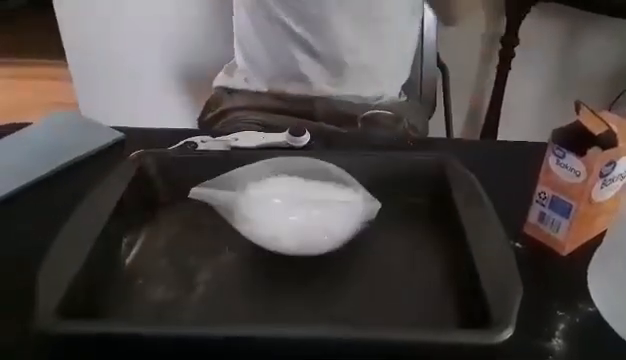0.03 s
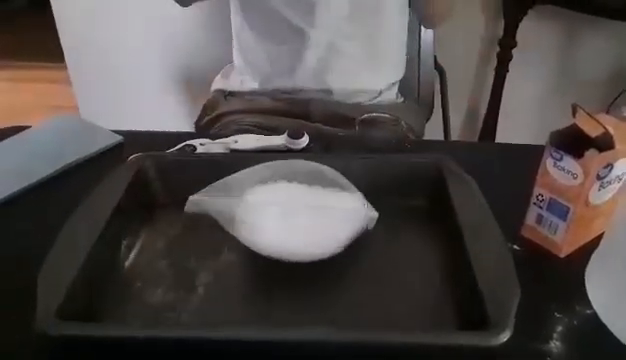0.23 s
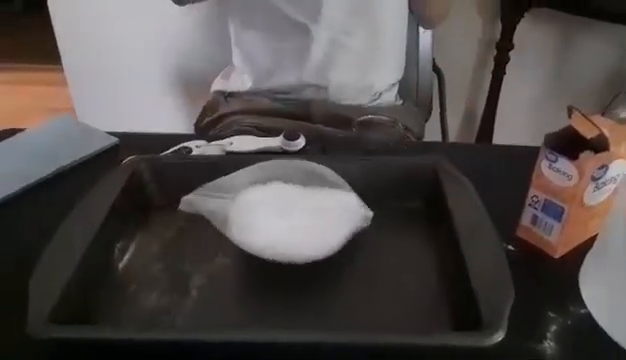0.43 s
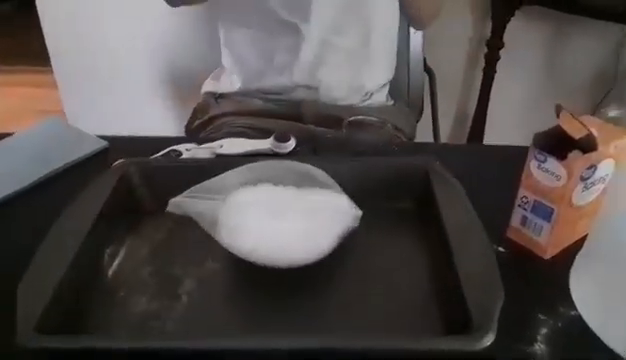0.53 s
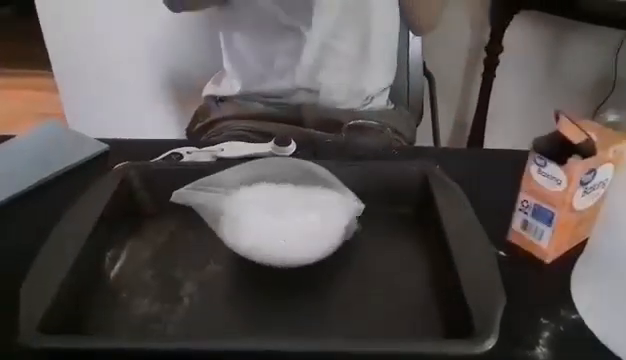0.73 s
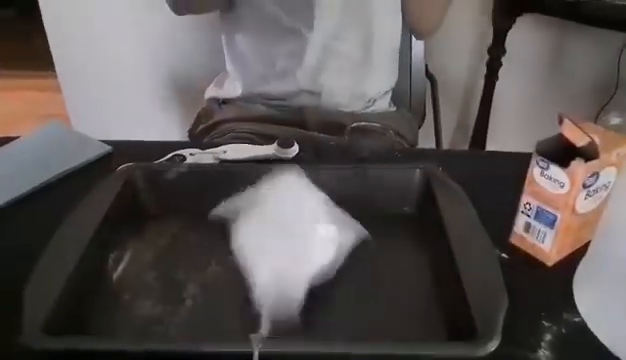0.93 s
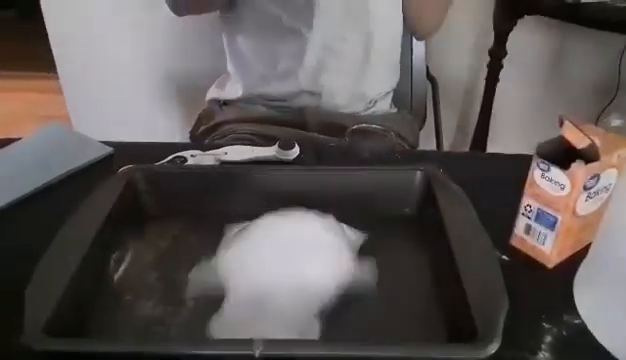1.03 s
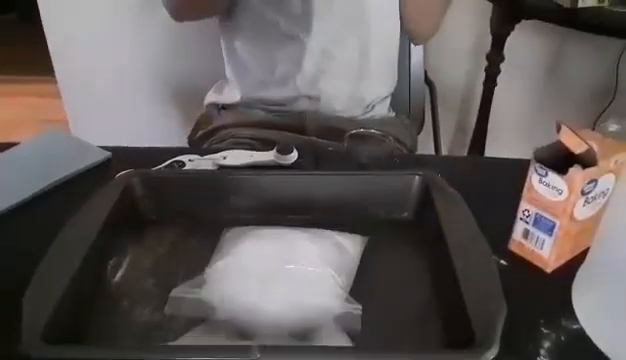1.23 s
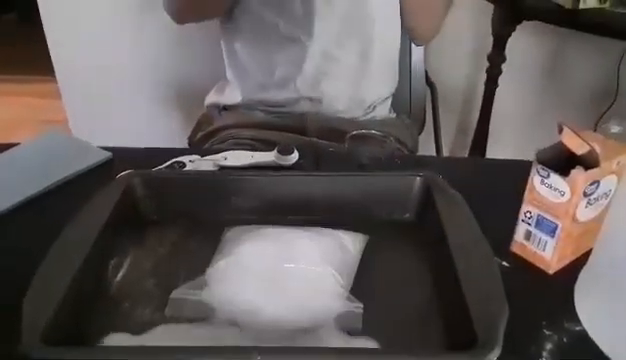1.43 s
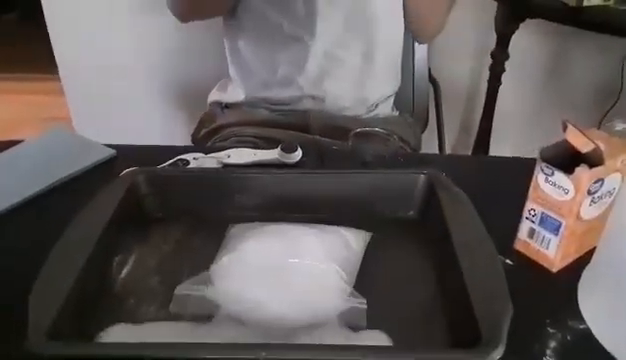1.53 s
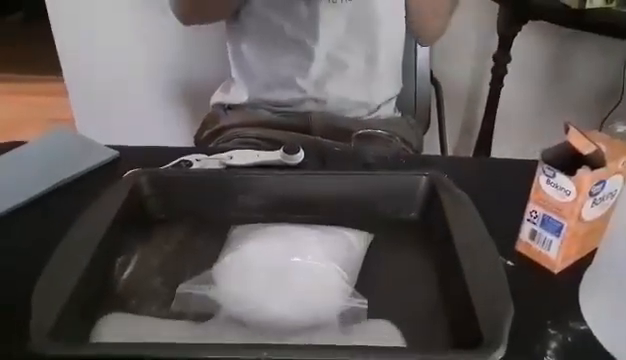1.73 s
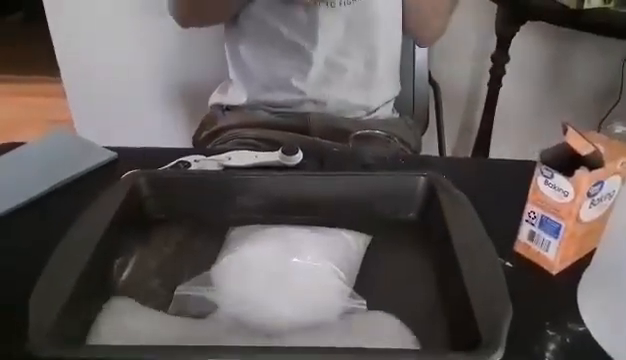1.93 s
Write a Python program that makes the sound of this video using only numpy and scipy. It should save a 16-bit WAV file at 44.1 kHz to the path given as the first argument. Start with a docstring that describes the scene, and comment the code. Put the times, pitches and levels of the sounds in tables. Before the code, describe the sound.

A plastic bag bursts with two loud bangs in a small room. Faint fizzing and a dull, fading rustle come first. At about 0.2 seconds a sharp, bright crack briefly rings a metal tray. At 0.8 seconds the bag gives way with a darker bang and a deep thump, dying quickly. Foam keeps hissing faintly, with a few tiny plastic ticks, until about 2 seconds.

```python
"""Soda and vinegar bag bursting

A sealed plastic bag of fizzing soda and vinegar swells in a metal baking tray, in a small room.
A sharp, bright crack rings tray and room; half a second later the bag bursts and the freed gas
thumps. Bubbles hiss throughout over a dull, fading rustle, and plastic and foam tick now and then."""
import sys
import numpy as np
from scipy import signal
from scipy.fft import rfft, irfft
from scipy.io import wavfile

SR = 44100
rng = np.random.default_rng(int(sys.argv[2]) if len(sys.argv) > 2 else 0)


def master(y):
    """Save y as 16-bit WAV."""
    cut = np.clip(np.atleast_2d(y).T, -1, 1)
    pcm = np.round(cut * 32767)  # scale
    wavfile.write(sys.argv[1], SR, pcm.astype(np.int16))


N = 88200
T = np.arange(N) / SR
HZ = np.maximum(np.fft.rfftfreq(N, 1 / SR), 1)

# the two bangs: start_s, shock_db, shock_length_s, room_db, room_swell_s
CRACK = (0.2306, -2, 0.0007, -10.9, 0.031)
BURST = (0.7969, -6, 0.0003, -20, 0.011)
# the steel tray's bright modes: pitch_hz, relative_db, t60_s
TRAY_MODES = [(850, -2, 0.26), (1121, -4, 0.22), (1873, 2, 0.17), (1927, 0, 0.18), (2027, -1.5, 0.18),
              (4668, -10, 0.22), (6102, -5.5, 0.22), (6690, -10, 0.22)]


def from_db(db):
    """Decibels to gain."""
    return 10 ** (np.asarray(db) / 20)


def rms_one(x):
    """Scale to unit level."""
    return x / np.sqrt(np.mean(x ** 2) + 1e-20)


def at_hz(points, hz):
    """Read a curve on a log-frequency axis."""
    freqs, values = np.transpose(points)
    return np.interp(np.log(hz), np.log(freqs), values)


def fader(points):
    """A dB curve as gain over time."""
    return from_db(np.interp(T, *np.transpose(points)))


def decay(age, t60):
    """One until age zero, then an exponential decay."""
    return from_db(-60 * np.maximum(age, 0) / t60)


def wander(rate_hz):
    """A random curve that glides to a new value rate_hz times a second."""
    return np.interp(T * rate_hz, np.arange(N), np.clip(rng.standard_normal(N), -2, 2))


def filtered(x, order, hz, kind):
    """A Butterworth filter."""
    return signal.sosfilt(signal.butter(order, hz, kind, fs=SR, output="sos"), x)


def band_of(x, low_hz, high_hz):
    """Keep one band of a signal, at unit level."""
    return rms_one(filtered(x, 2, [low_hz, high_hz], "band"))


def coloured(x, colour):
    """Shape a signal with an EQ curve, at unit level."""
    return rms_one(irfft(rfft(x) * from_db(at_hz(colour, HZ)), N))


def diffuse():
    """White stereo noise, centred in the bass and wide in the treble."""
    # likeness of left and right: freq_hz, correlation
    likeness = [(100, 0.97), (350, 0.93), (550, 0.82), (850, 0.5), (2000, 0.35), (3300, 0.05)]
    mid, side = rfft(rng.standard_normal((2, N)))
    alike = at_hz(likeness, HZ)
    return irfft(np.sqrt(1 + alike) * mid + np.sqrt(1 - alike) * side * [[1], [-1]], N)


def fizz():
    """Tiny bubbles merge into a hiss and larger ones pop singly; once spilled, the foam rings the tray."""
    # the foam's hiss: time_s, level_db
    hiss_level = [(0, -47.6), (0.2, -46.3), (0.3, -53), (0.55, -59.5), (0.75, -63.6), (1.1, -62.8),
                  (1.35, -65.6), (1.58, -65.2), (1.65, -62.8), (1.72, -64.2), (1.89, -64.2), (1.96, -60.2)]
    # the bubbles' tone: freq_hz, relative_db
    colour = [(60, -36), (200, -19), (420, -4), (700, -9.5), (1100, -4.5), (1400, -6), (1800, -1.5),
              (2500, -6.5), (4000, -5.5), (6600, -6.3), (7700, -20), (12000, -19)]
    pops_per_s, spread_db = 900, 3.5
    sizes = from_db(spread_db * np.minimum(rng.exponential(1, (2, N)), 5))
    signs = rng.choice([-1, 1], (2, N))
    clicks = sizes * signs * (rng.random((2, N)) < pops_per_s / SR)
    pops = from_db(-9) * coloured(clicks, colour)
    spill = from_db(-6) * (T > BURST[0]) * band_of(diffuse(), 1730, 2060)
    hiss = coloured(diffuse(), colour)
    return fader(hiss_level) * (hiss + pops + spill)


def rustle():
    """A dull rustle of movement near the table."""
    # the rustle's uneven fade: time_s, level_db
    rustle_level = [(0, -52), (0.22, -53), (0.42, -60), (0.49, -55), (0.58, -72), (0.62, -72), (0.65, -65),
                    (0.69, -73), (1.15, -77), (1.25, -85), (1.65, -84), (1.8, -100)]
    # its bass-heavy tone: freq_hz, relative_db
    colour = [(30, -19), (90, -8), (160, 2), (300, -5), (450, -4), (900, -10), (2500, -35)]
    return fader(rustle_level) * coloured(diffuse(), colour)


def shock(start, db, length):
    """An N-shaped pressure pulse and its first bounces, a touch later on the right."""
    # reflections off tray and table: delay_s, relative_db
    bounces = [(0.0027, -7), (0.005, -9)]
    lag_s = np.array([[0], [0.0001]])
    out = np.zeros((2, N))
    for delay, bounce_db in [(0, 0)] + bounces:
        progress = (T - start - delay - lag_s) / length
        out += from_db(db + bounce_db) * (1 - 2 * progress) * ((progress >= 0) & (progress < 1))
    return filtered(out, 2, 6000, "low")


def rippled(x):
    """Crowded resonances of tray and table leave narrow peaks and dips above the lowest bright mode."""
    depth_db, spacing_hz = 3.2, 55
    knots = np.arange(2000) * spacing_hz
    ripple = np.interp(HZ, knots, np.clip(rng.standard_normal(len(knots)), -2, 2))
    return irfft(rfft(x) * from_db(depth_db * ripple * (HZ > TRAY_MODES[0][0])), N)


def room(start, db, swell_s, colour):
    """Reflections swell in ragged clumps, then die band by band, leaving a faint late tail."""
    # the room's decay: freq_hz, t60_s
    decay_times = [(50, 0.25), (170, 0.29), (400, 0.27), (1000, 0.26), (2200, 0.24), (6000, 0.245)]
    ragged_db, swell_db_per_s, attack_s = 1.8, 90, 0.002
    spectrum = rfft(coloured(rippled(diffuse()), colour))
    age, out = T - start, 0
    late = from_db(-35) * decay(age, t60=0.9)
    for k, (_, t60) in enumerate(decay_times):
        band = at_hz([(hz, j == k) for j, (hz, _) in enumerate(decay_times)], HZ)
        early = decay(age - swell_s, t60) * from_db(ragged_db * wander(rate_hz=250))
        out += irfft(spectrum * band, N) * (early + late)
    swell_db = swell_db_per_s * np.minimum(age - swell_s, 0)
    return from_db(db + swell_db) * np.clip(age / attack_s, 0, 1) * out


def bang(event, colour):
    """A shock and the room's answer, leaning to one side band by band."""
    # stereo lean: freq_hz, left_minus_right_db
    balance = [(550, -0.5), (850, 1.5), (1900, 2), (2800, -1), (6000, -4), (8500, -1)]
    start, shock_db, length, room_db, swell_s = event
    sound = shock(start, shock_db, length) + room(start, room_db, swell_s, colour)
    pan = from_db(at_hz(balance, HZ) * np.array([[.5], [-.5]]))
    return irfft(rfft(sound) * pan, N)


def crack():
    """A sharp crack, and the room answers brightly."""
    # the crack's reverb tone: freq_hz, relative_db
    colour = [(35, -38), (90, -25), (140, -14), (290, -14), (335, 2), (480, 0.5), (610, -7), (800, -1),
              (1350, -10), (1900, 1), (2350, -9.5), (4500, -14.3), (6600, -10.5), (7700, -30),
              (11000, -30.5)]
    return bang(CRACK, colour)


def tray_ring():
    """The tray's ring builds up during the crack, then dies; each ear hears it in another phase."""
    ring_db, build_s = -24, 0.03
    age, out = T - CRACK[0], 0
    for hz, db, t60 in TRAY_MODES:
        phase = rng.uniform(0, 2 * np.pi) + rng.standard_normal((2, 1))
        out += from_db(ring_db + db) * np.sin(2 * np.pi * hz * age + phase) * decay(age - build_s, t60)
    return out * np.clip(age / build_s, 0, 1)


def bright_snaps():
    """Bright snaps of a few milliseconds sharpen the bangs."""
    # bright snaps: start_s, level_db
    snaps = [(0.2305, -13), (0.262, -18), (0.7968, -10.5)]
    # their tone: freq_hz, relative_db
    colour = [(300, -6), (900, 10), (1450, -7), (2800, 3), (3800, -3), (6500, -3), (7800, -19)]
    envelope = sum(from_db(db) * (T >= start) * decay(T - start, t60=0.009) for start, db in snaps)
    return envelope * coloured(diffuse(), colour)


def boom():
    """Both bangs ring the low modes, which build over a few cycles and waver as the liquid sloshes."""
    # low modes of tray and room: pitch_hz, relative_db, t60_s
    modes = [(150, -16, 0.28), (199, -11, 0.2), (235, -1, 0.22), (333, 1.5, 0.24), (366, 0, 0.24),
             (417, -2.5, 0.31), (463, -16, 0.5), (522, 1, 0.25), (592, -1.5, 0.18), (662, -6, 0.18)]
    # the push from each bang: start_s, level_db
    kicks = [(0.2335, -28), (0.8022, -17.8)]
    waver, build_s = 0.015, 0.012
    out = np.zeros(N)
    for start, kick_db in kicks:
        age = np.maximum(T - start, 0)
        for k, (hz, db, t60) in enumerate(modes):
            slosh = 1 + waver * wander(rate_hz=25)
            cycles = np.cumsum(hz * slosh * (age > 0)) / SR
            ring = np.sin(2 * np.pi * cycles) * decay(age, t60) * np.minimum(age / build_s, 1)
            out += (-1) ** k * from_db(kick_db + db) * ring
    return out


def dull_smacks():
    """Dull low-mid smacks follow each bang."""
    # dull smacks: start_s, level_db
    smacks = [(0.2515, -13), (0.8035, -20), (0.826, -20)]
    band_hz, attack_s = (400, 760), 0.002
    envelope = 0
    for start, db in smacks:
        age = T - start
        envelope += from_db(db) * np.clip(age / attack_s, 0, 1) * decay(age, t60=0.05)
    return envelope * band_of(band_of(diffuse(), *band_hz), *band_hz)


def ticks():
    """Slack plastic and foam give short snaps and soft scuffs, each with a little room after it."""
    # small snaps and scuffs: start_s, level_db, pitch_hz, rise_s
    events = [(0.415, -50, 1000, 0.002), (0.467, -47, 2200, 0.003), (0.533, -57, 1100, 0.005),
              (0.635, -59, 800, 0.02), (0.955, -56, 2000, 0.002), (1.0878, -52, 6800, 0.001),
              (1.093, -62, 230, 0.012), (1.2735, -64, 2500, 0.001), (1.418, -64, 2000, 0.001),
              (1.6195, -61.5, 2000, 0.001), (1.662, -62, 1900, 0.001)]
    noise = filtered(diffuse(), 8, 6800, "low")
    out = 0
    for start, db, hz, rise in events:
        snap = band_of(noise, hz * .55, hz * 1.6)
        since_peak = T - start - rise
        room_tail = from_db(-12) * decay(since_peak, t60=0.22)
        fall = decay(since_peak, t60=0.022) + room_tail
        out += from_db(db) * snap * np.clip(1 + since_peak / rise, 0, 1) * fall
    return out


def burst():
    """The bag gives way with a shorter shock and a darker answer from the room."""
    # the burst's reverb tone: freq_hz, relative_db
    colour = [(35, -26), (105, -25), (150, -6), (330, 2), (590, 4.5), (780, -7), (1100, -16), (1700, -13),
              (2700, -17.5), (3600, -19.5), (4400, -10), (5300, -17), (6400, -13.5), (7600, -30),
              (11000, -36)]
    return bang(BURST, colour)


def thump():
    """The freed gas overshoots and swings back once, with a short puff of deep bass."""
    start_s, swing_hz, puff_hz = 0.7975, 330, 55
    age = np.maximum(T - start_s, 0)
    one_cycle = -np.sin(2 * np.pi * np.minimum(age * swing_hz, 1))
    swing = filtered(one_cycle, 1, 130, "high")
    puff = np.sin(2 * np.pi * puff_hz * age) * decay(age, t60=0.07)
    return from_db(0.5) * swing + from_db(-29) * puff


def scene():
    """Two bangs over the fizzing foam."""
    bangs = crack() + tray_ring() + burst() + bright_snaps() + dull_smacks() + thump() + boom()
    return bangs + fizz() + rustle() + ticks()


def record(dry):
    """The microphone rounds the highest peaks; the top treble is cut."""
    ceiling, cutoff_hz = 1.1, 12500
    rounded = dry / (1 + (dry / ceiling) ** 4) ** .25
    return signal.sosfilt(signal.ellip(10, .2, 80, cutoff_hz, fs=SR, output="sos"), rounded)


dry = scene()
out = record(dry)
master(out)
```